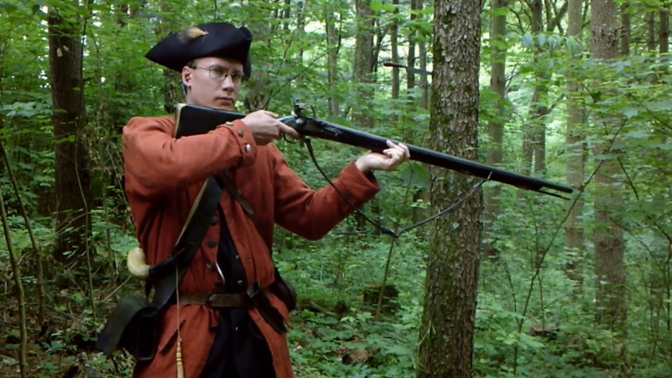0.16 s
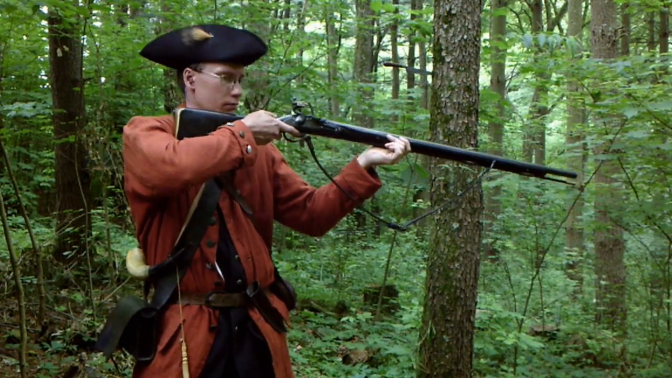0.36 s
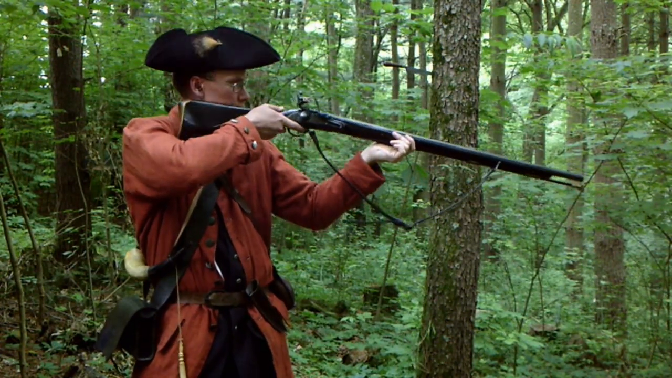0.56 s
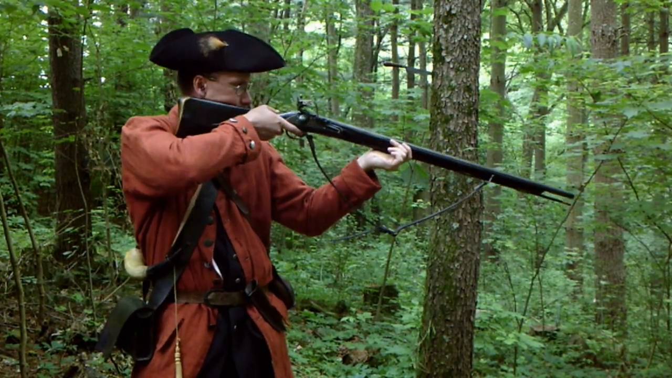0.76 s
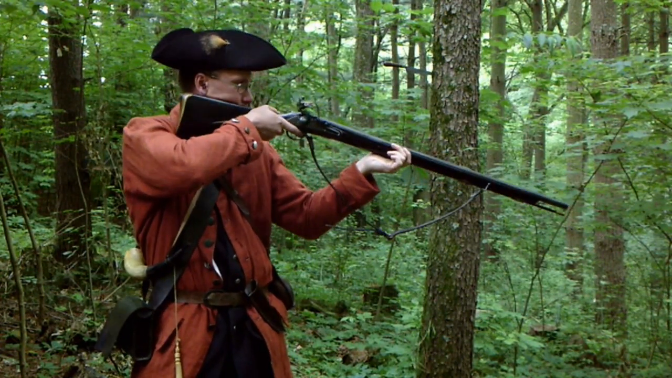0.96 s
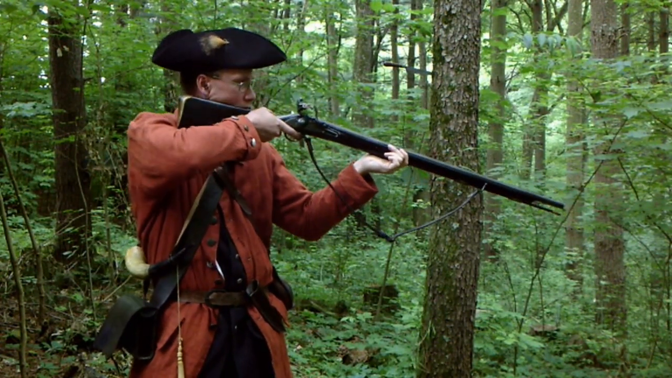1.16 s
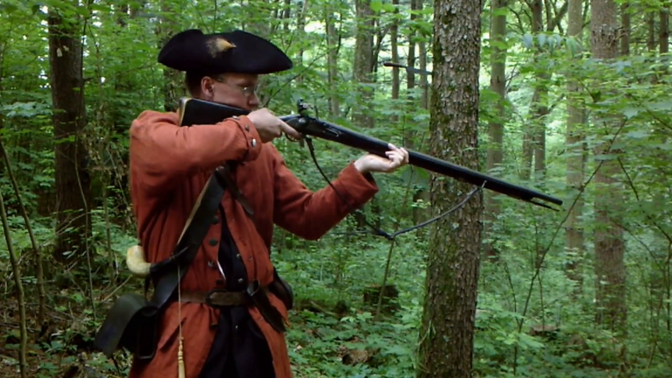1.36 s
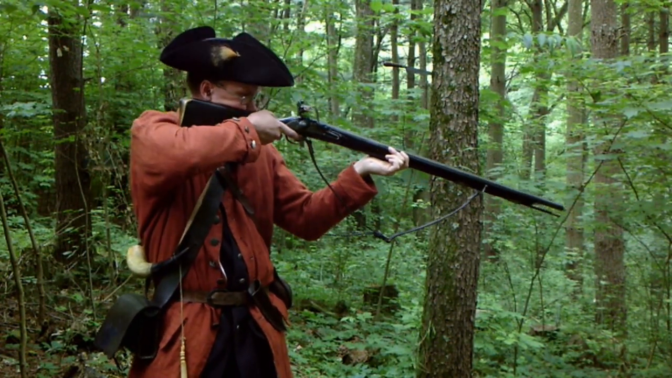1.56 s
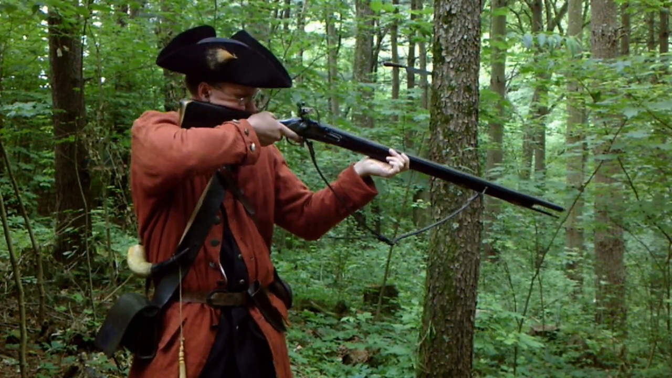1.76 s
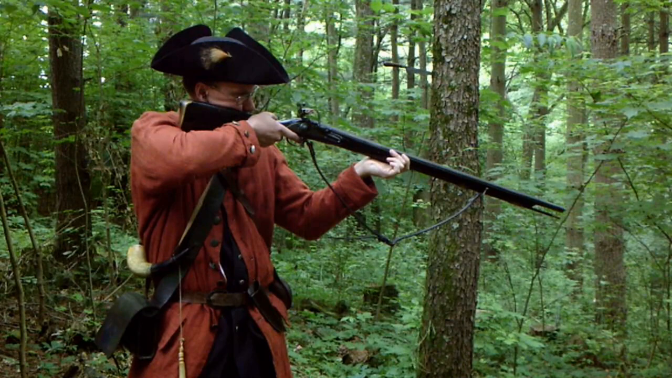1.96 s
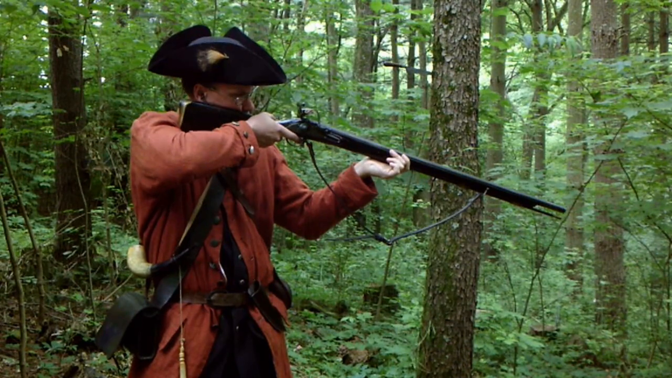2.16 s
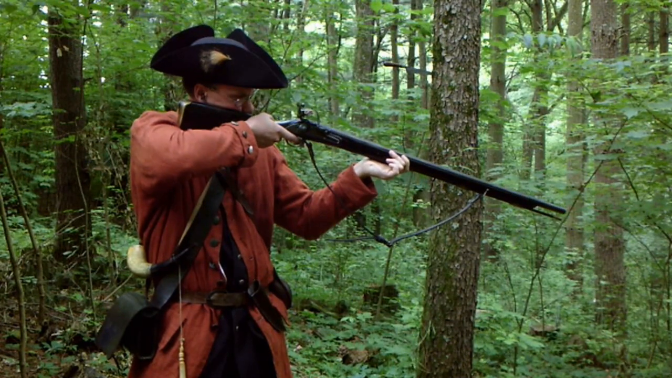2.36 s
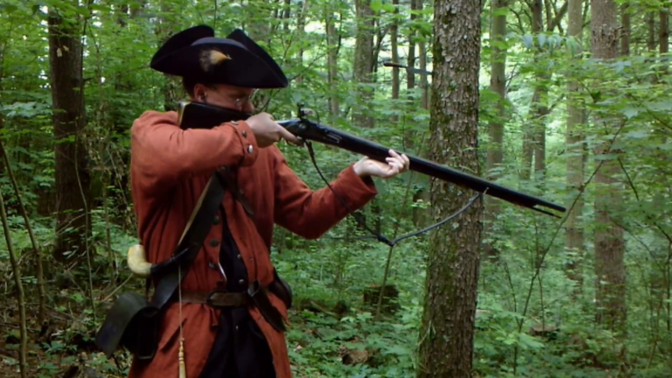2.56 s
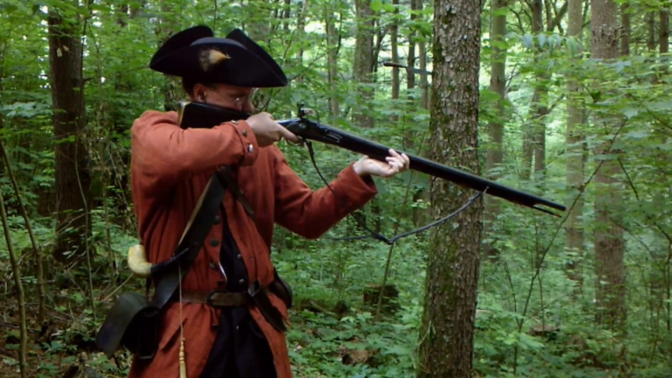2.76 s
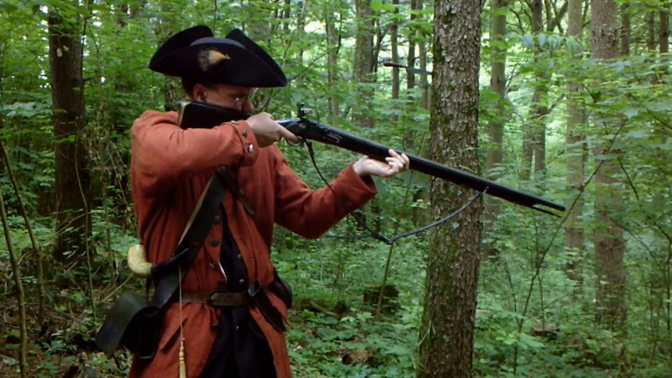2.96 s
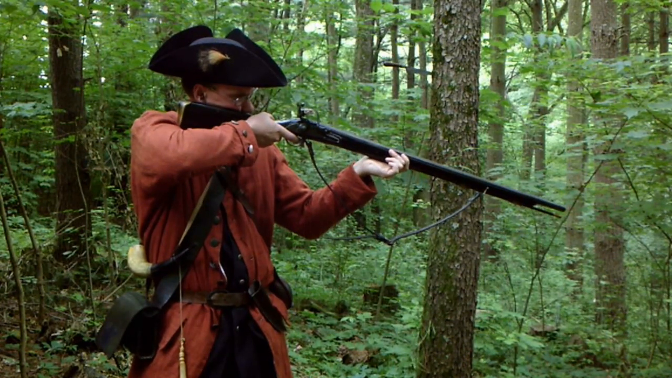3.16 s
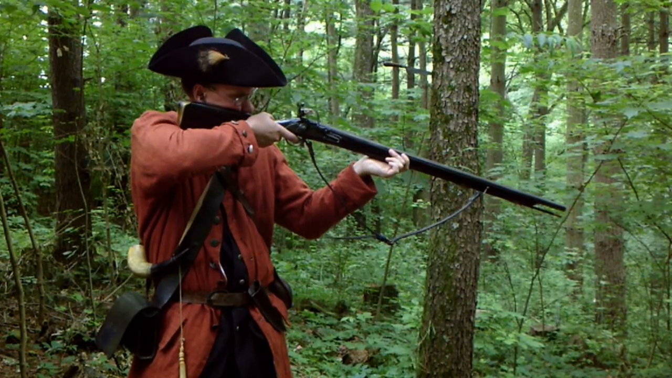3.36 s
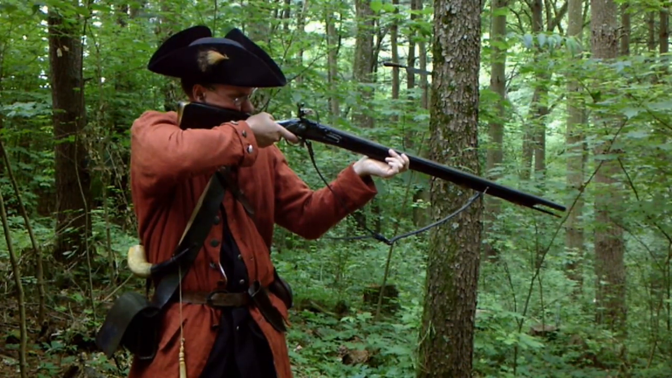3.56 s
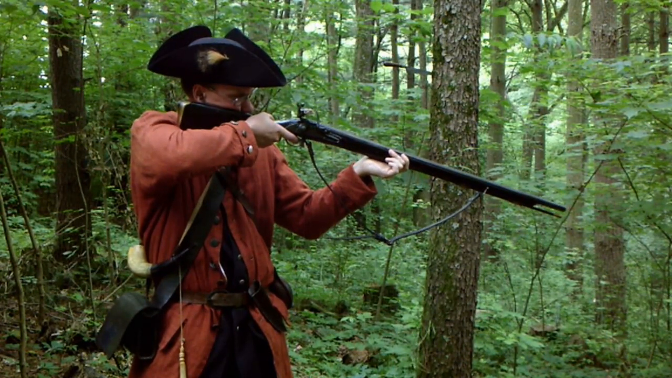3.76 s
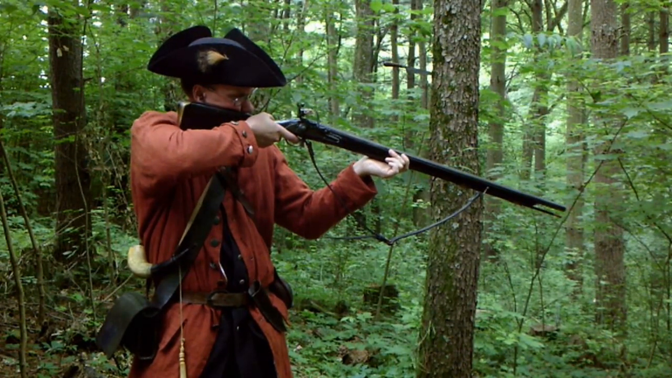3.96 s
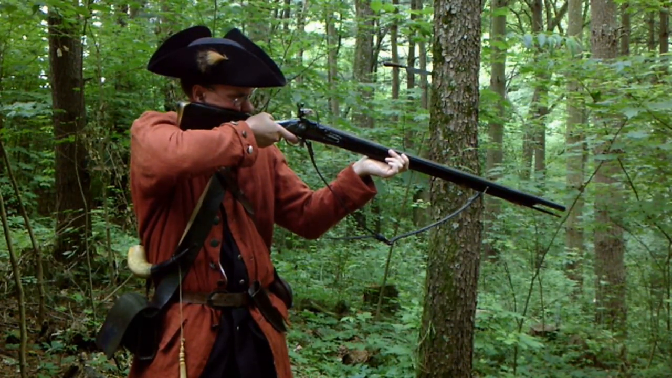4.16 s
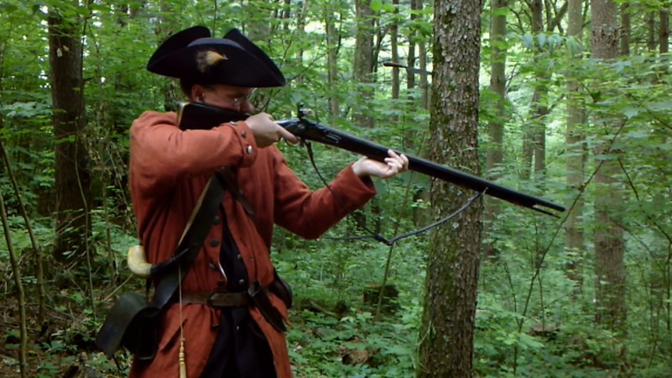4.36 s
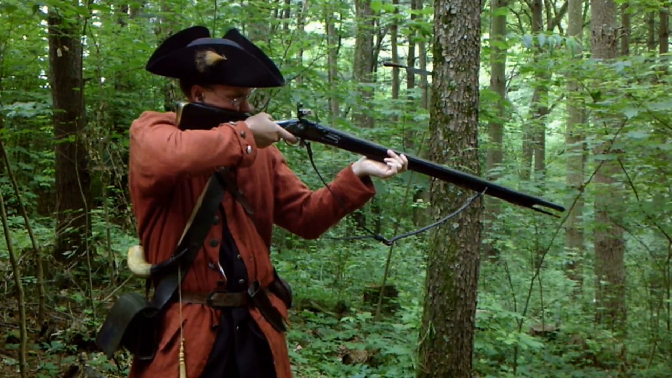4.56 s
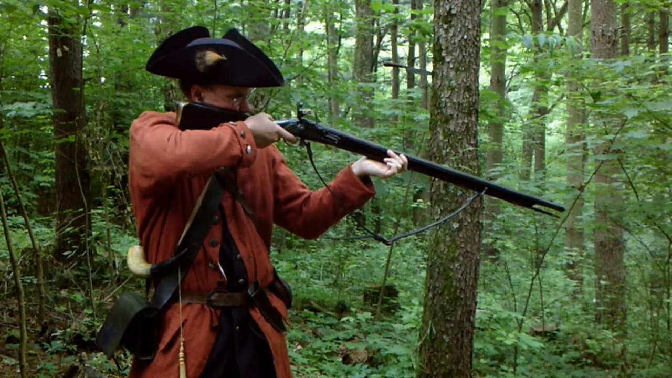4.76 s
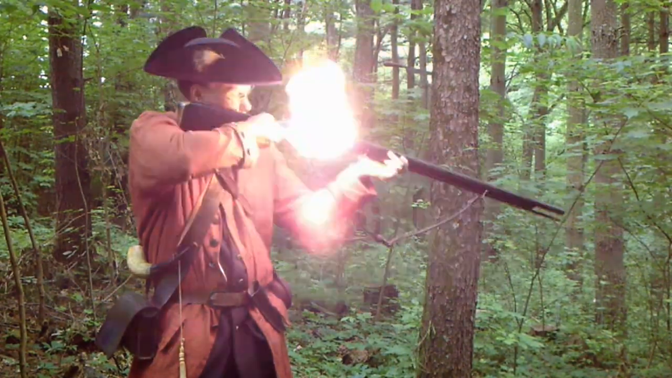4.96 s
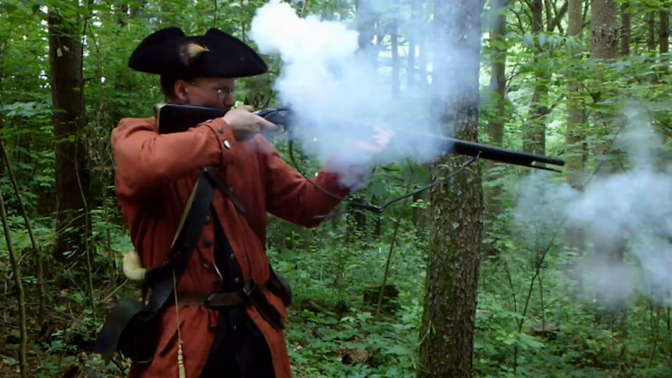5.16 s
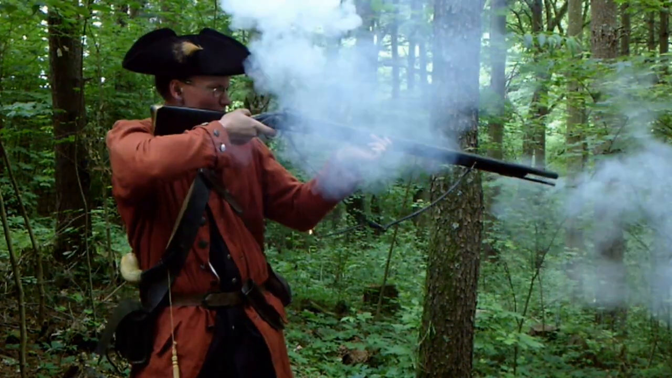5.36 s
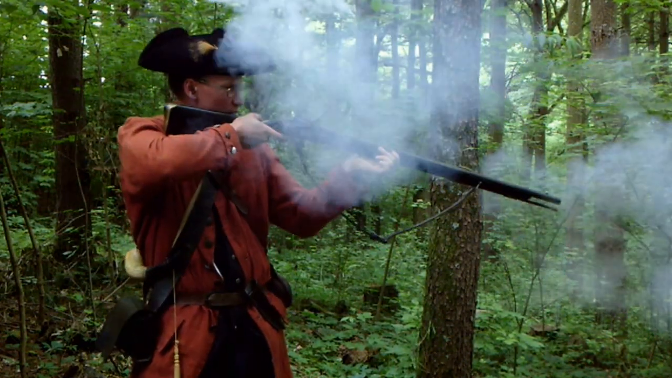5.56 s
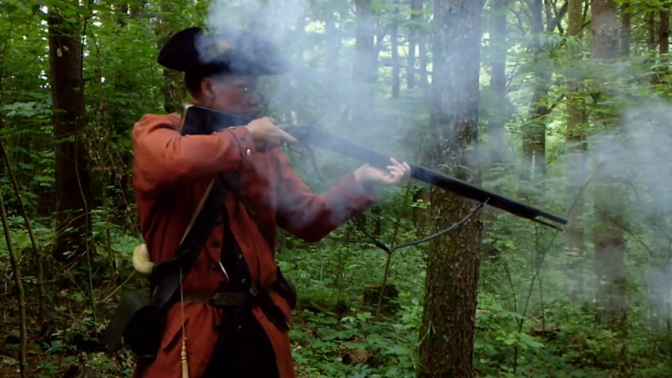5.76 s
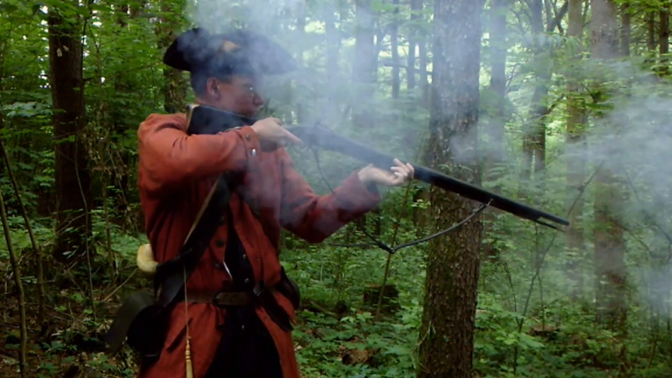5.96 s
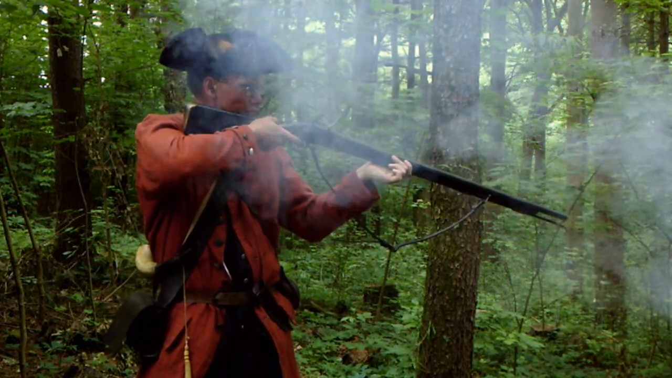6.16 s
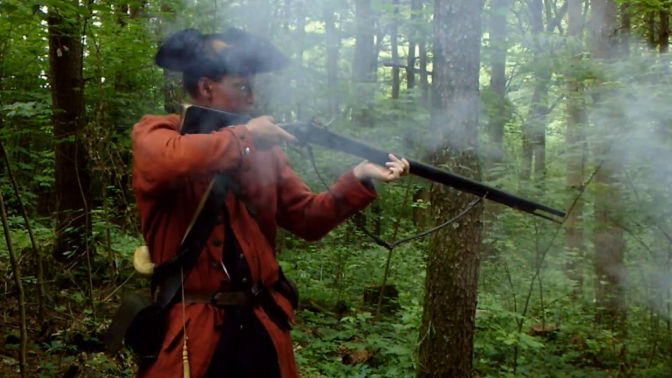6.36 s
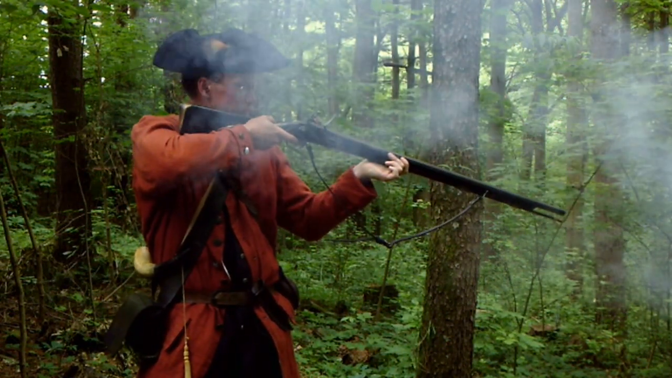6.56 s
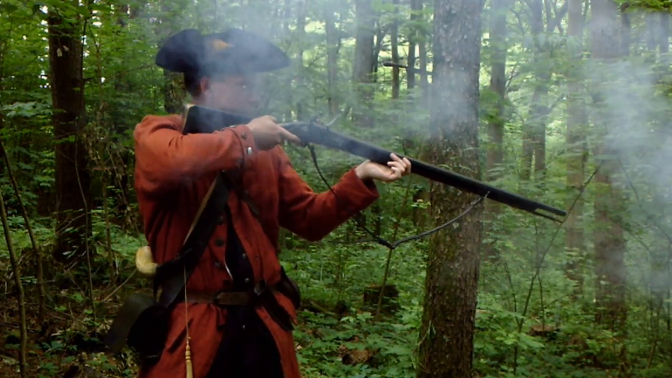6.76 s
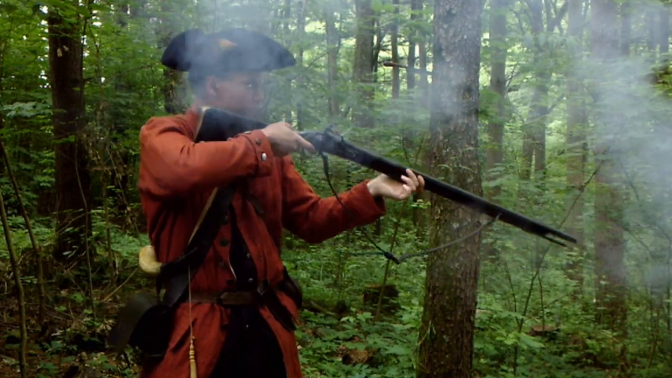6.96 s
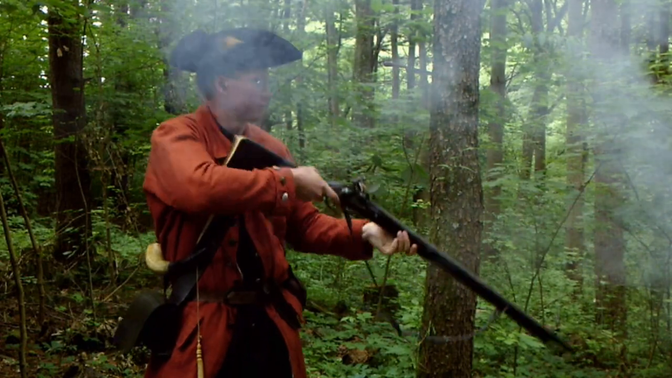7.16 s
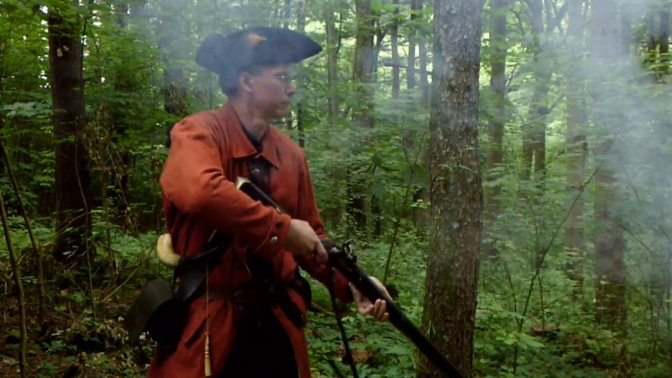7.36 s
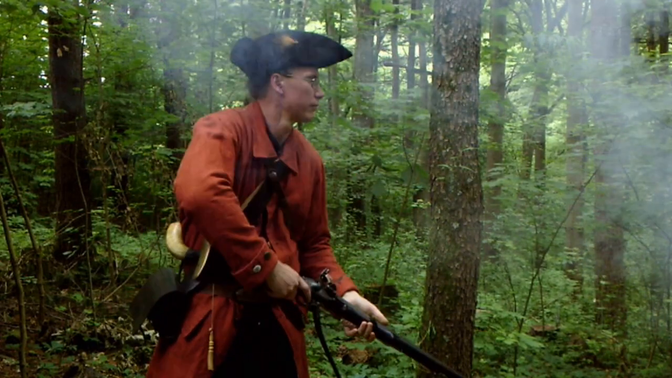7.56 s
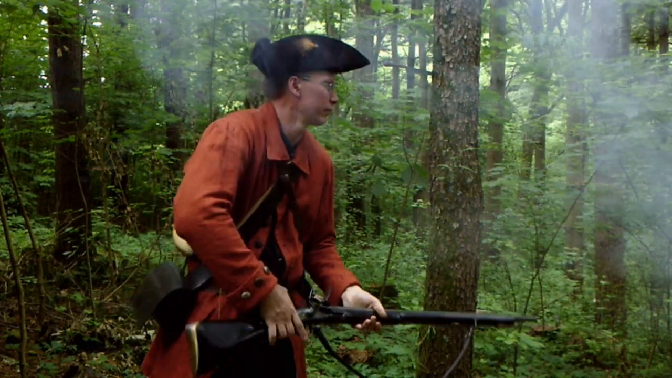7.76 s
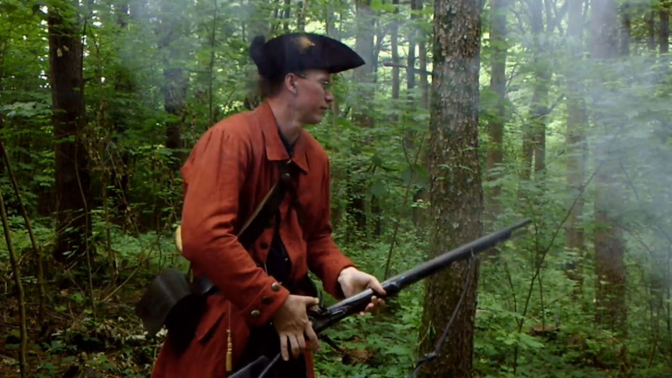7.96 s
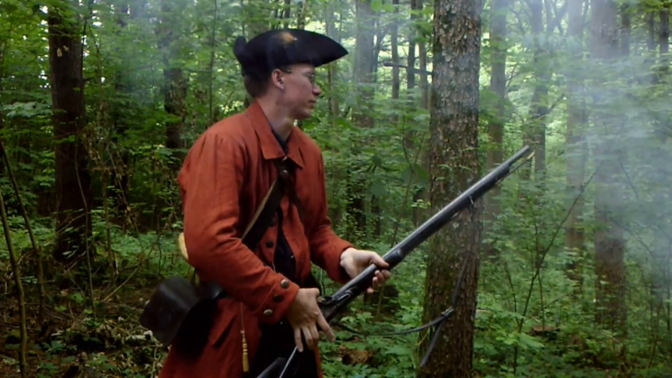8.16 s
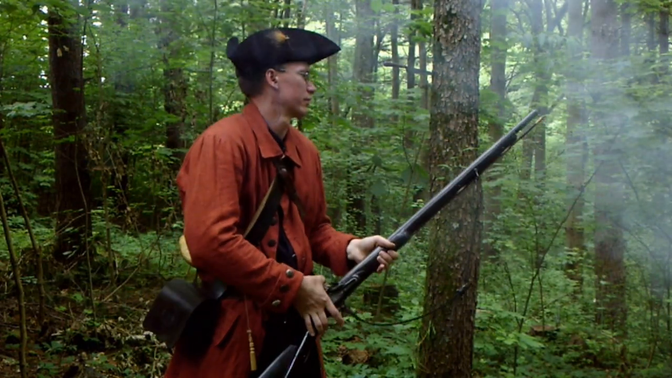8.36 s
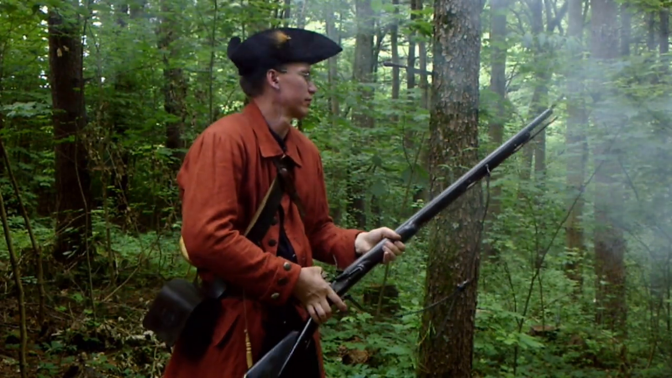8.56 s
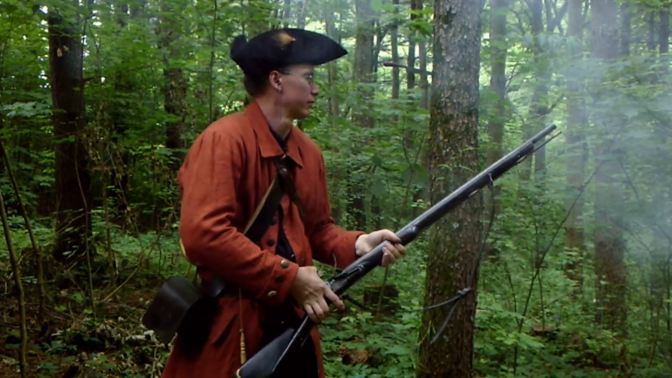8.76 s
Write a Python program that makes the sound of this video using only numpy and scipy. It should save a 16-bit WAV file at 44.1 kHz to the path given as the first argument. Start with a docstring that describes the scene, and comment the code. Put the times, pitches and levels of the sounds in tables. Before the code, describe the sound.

Birds chirp in a quiet wood, then a flintlock snaps and hisses and a huge overloaded musket blast rolls away among the trees.

```python
"""A flintlock musket fired in a wood, close to the microphone: flint on steel, hissing priming, then the charge.
Lock and fittings are struck sets of decaying modes with scrapes; hiss, puff and report are shaped noise.
The blast, a pressure pulse and gas noise, overloads the microphone and rolls away among the trunks.
Small birds, bending sine whistles, sing far off over a low rumble of air; cloth rubs now and then.
Later the gun's fittings clack as it is lowered."""
import sys
import numpy as np
from scipy import signal
from scipy.fft import rfft, irfft, next_fast_len
from scipy.io import wavfile
from scipy.ndimage import map_coordinates

SR = 44100
rng = np.random.default_rng(int(sys.argv[2]) if len(sys.argv) > 2 else 0)


def generate_wav(sig):
    """Save sig (samples, or channels by samples) to the path in sys.argv[1] as 16-bit PCM at SR."""
    pcm = np.round(np.clip(np.atleast_2d(sig).T, -1, 1) * 32767).astype(np.int16)
    wavfile.write(sys.argv[1], SR, pcm)


N = 389403  # length in samples


def amp(db):
    """Decibels to gain."""
    return 10 ** (np.asarray(db) / 20)


def unit(x):
    """Scale to rms 1."""
    return x / np.sqrt(np.mean(x ** 2) + 1e-20)


def along(points, hz):
    """Read (Hz, value) points on a log frequency axis."""
    point_hz, values = np.transpose(points)
    return np.interp(np.log(hz + 1), np.log(point_hz + 1), values)


def clock():
    """The time of every sample in seconds."""
    return np.arange(N) / SR


def wobble(rate):
    """A smooth random curve with rate knots a second."""
    knots = rng.standard_normal(int(N * rate / SR) + 4)
    return map_coordinates(knots, [clock() * rate])


def filtered(x, response):
    """Multiply the spectrum of x by a response of frequency."""
    size = next_fast_len(N + SR // 2)
    hz = np.fft.rfftfreq(size, 1 / SR)
    return irfft(rfft(x, size) * response(hz), size)[:N]


def noise(spectrum):
    """Random noise coloured by a spectrum, at rms 1."""
    white = rng.standard_normal(N)
    return unit(filtered(white, lambda hz: amp(along(spectrum, hz))))


def add(track, s, sound):
    """Mix a sound into the track from time s."""
    room = track[round(s * SR):][:len(sound)]
    room += sound[:len(room)]


def fade(t, t60):
    """Exponential decay, 60 dB down after t60 seconds."""
    return np.exp(-np.log(1000) * t / t60)


def envelope(start, attack, hold, t60):
    """A straight rise, a hold and an exponential release, in seconds."""
    t = clock() - start
    return np.clip(t / attack, 0, 1) * fade(np.maximum(t - attack - hold, 0), t60)


def scattered(x, wet_db, t60):
    """A sound with its soft return from the nearby trees, a decaying random tail."""
    t = np.arange(SR) / SR
    tail = rng.standard_normal(SR) * fade(t, t60)
    tail /= np.linalg.norm(tail)
    return x + amp(wet_db) * signal.fftconvolve(x, tail)[:N]


# Spectrum of the open air in the wood. Each row: frequency in Hz, relative density in dB per Hz.
AIR = [(5, 1.5), (15, 1.5), (24, -3.5), (66, -11.5), (108, -15.5), (200, -21.5), (310, -26), (450, -27),
       (620, -32.5), (1000, -36), (1700, -42), (3000, -42.5), (4800, -48), (6500, -53.5)]
AIR_DB = -34


def air():
    """Moving air: a restless rumble under the faint hush of leaves."""
    whole = noise(AIR)
    rumble = filtered(whole, lambda hz: 1 / (1 + (hz / 150) ** 2))
    hush = whole - rumble
    rumble_gain = amp(1.76 * wobble(7))
    hush_gain = amp(0.21 * wobble(2) + 0.77 * wobble(23))
    return amp(AIR_DB) * (rumble * rumble_gain + hush * hush_gain)


# Shapes of bird notes by name. Each list: pitch ratios at even steps through the note.
SHAPES = {"fall": [1.5, 1.01, .71], "rise": [.76, 1, 1.22], "sag": [1.13, 0.98, .85], "arch": [.8, 1, .85],
          "scoop": [1.08, 1, 1.11], "held": [1.01, 0.99, 0.97]}
WARBLE, WARBLE_RATE = .021, 150  # unsteadiness of pitch: greatest scale as a share, random knots a second


def syllable(shape, length, hz):
    """A whistle that bends smoothly through its shape; the faster the bend, the more it warbles, up to a limit."""
    ratios = SHAPES[shape]
    u = np.linspace(0, 1, int(length * SR))  # progress through the note
    steps = np.linspace(0, 1, len(ratios))
    bend = np.polyval(np.polyfit(steps, ratios, len(ratios) - 1), u)
    turns = map_coordinates(rng.standard_normal(size=256), [u * length * WARBLE_RATE], mode="mirror")
    bend_speed = np.ptp(ratios) / length
    warble = WARBLE * turns * min(bend_speed / 3.5, 1)
    swell = np.sqrt(np.clip(8 * u * (1 - u), 0, 1))
    return swell * np.sin(2 * np.pi * np.cumsum(hz * bend * (1 + warble)) / SR)


# The nearest bird's phrase: a downslur, an upsweep and a low closing note. Each row: upsweep start in seconds,
# its pitch in Hz, its relative level in dB, downslur lead in seconds, downslur relative level in dB,
# closing note lag in seconds.
PHRASES = [(.125, 3450, -55, .08, -62, .19), (1.18, 3200, -55.5, .145, -58.5, 0.043),
           (2.175, 3150, -54, 0.27, -52.5, .05), (2.535, 3050, -56, .15, -66, .085),
           (3.06, 3140, -51, 0.077, -59, 0.13), (4.085, 3050, -50, .075, -61, .12),
           (7.525, 2750, -54.5, .15, -61, .16)]
# Single notes: a few arch syllables just before the nearest bird's upsweeps, the rest calls of other birds in
# the wood. # Each row: start in seconds, shape, length in seconds, pitch in Hz, relative level in dB.
NOTES = [(.19, "sag", .055, 3900, -57), (.3, "arch", 0.057, 3500, -54), (.545, "arch", .09, 4850, -57.5),
         (.64, "rise", .06, 4450, -62), (.78, "scoop", .32, 3830, -57.5), (1.12, "held", .42, 4560, -69),
         (1.115, "arch", .08, 3000, -57), (2.115, "arch", .06, 2840, -55), (2.44, "arch", 0.038, 4090, -56),
         (3.42, "held", 0.73, 3590, -63.5), (4.05, "held", 0.24, 3070, -56), (4.14, "held", .36, 3720, -61),
         (4.49, "sag", .07, 3950, -56.5), (4.35, "held", .55, 3496, -65.5),
         (6.55, "sag", 0.089, 3320, -52.5), (7.06, "sag", .07, 4150, -60), (7.272, "rise", .03, 4150, -55),
         (7.465, "arch", .055, 2700, -55.5), (7.658, "arch", .055, 3500, -51.5),
         (7.75, "rise", .19, 4030, -62), (7.94, "arch", .12, 3350, -55.5), (8.57, "rise", 0.063, 4150, -55)]
SLUR_S, SLUR_HZ = .11, 2900  # downslur length and base pitch
SWEEP_S = .075  # upsweep length
CLOSE_S, CLOSE_HZ, CLOSE_DB = .07, 2520, -3  # closing note; level against the upsweep


def birds():
    """One bird repeats its whistled phrase, others call between; farther ones twitter at random times."""
    out = np.zeros(N)
    for s, hz, db, lead, slur_db, lag in PHRASES:
        add(out, s - lead, amp(slur_db) * syllable("fall", SLUR_S, SLUR_HZ))
        add(out, s, amp(db) * syllable("rise", SWEEP_S, hz))
        add(out, s + lag, amp(db + CLOSE_DB) * syllable("sag", CLOSE_S, CLOSE_HZ))
    for s, shape, length, hz, db in NOTES:
        add(out, s, amp(db) * syllable(shape, length, hz))
    for when, span, distance, height, kind in rng.random(size=(50, 5)):
        shape = ("rise", "sag", "arch")[int(3 * kind)]
        note = syllable(shape, .02 + .05 * span, 2350 + 2000 * height)
        add(out, when * N / SR, amp(-59.0 - 7 * distance) * note)
    return out * amp(-1.1 + 1.8 * wobble(45))  # the level flutters


# The shooter's coat and straps shift. Each row: start in seconds, length in seconds, relative level in dB.
SHIFTS = [(0, .44, -52.5), (2.3, .42, -54), (3.08, .11, -50), (3.33, 0.4, -55.5), (3.818, .17, -52.5),
          (7.58, 0.5, -52.5)]
# Spectrum of the rubbing cloth. Each row: frequency in Hz, relative density in dB per Hz.
CLOTH = [(100, -18), (300, 3), (700, 3.5), (1400, -3), (3000, -4.5), (5500, -15.5)]


def coat():
    """Cloth rubs in short, grainy strokes of noise."""
    strokes = np.zeros(N)
    for s, length, db in SHIFTS:
        add(strokes, s, amp(db) * np.sin(np.linspace(0, np.pi, int(length * SR))))
    return strokes * unit(noise(CLOTH) * amp(3.6 * wobble(150)))


# Spectrum of the distant hillside's answer. Each row: frequency in Hz, relative density in dB per Hz.
DISTANT = [(100, -19.5), (250, -3), (450, 1), (620, -6.5), (770, 2.5), (920, -10), (1400, -10), (2500, -20),
           (5000, -33)]
HILL_S, HILL_DB = 6.32, -48


def hillside():
    """The report comes back late from far away, drawn out and with its treble gone."""
    swell = envelope(HILL_S, attack=.3, hold=.7, t60=3.6)
    return amp(HILL_DB + 1.2 * wobble(23)) * swell * noise(DISTANT)


def strike(modes, scrape, scrape_t60):
    """One metal contact: decaying modes at new strengths and a short noise scrape."""
    t = np.arange(SR // 4) / SR
    hit = scrape * fade(t, scrape_t60) * rng.standard_normal(len(t))
    for hz, db, t60 in modes:
        tone = np.sin(2 * np.pi * (hz * t + rng.random()))
        hit += amp(db + rng.normal(0, 3)) * fade(t, t60) * tone
    return hit * (1 - np.exp(-t / 0.00025))  # softened onset


# Clacks as the gun is lowered. Each row: start in seconds, relative level in dB, cutoff in Hz above which
# the contact excites little.
RATTLE = [(7.602, -37, 2400), (7.6078, -30, 2400), (7.6385, -41, 6000), (7.6422, -28, 2400),
          (8.7116, -40, 6000), (8.7137, -25.5, 6040), (8.7158, -21.5, 4400), (8.719, -24, 2400)]
# Ringing modes of the fittings. Each row: frequency in Hz, mean relative level in dB, t60 in seconds.
FITTINGS = [(1610, -4, 0.015), (2038, 2.5, 0.029), (2250, 4, 0.012), (2566, 1.5, 0.019), (3130, 1.5, 0.015),
            (3350, -2.5, 0.016), (4160, 4.5, .016), (5040, -4, 0.026)]
STOCK_S, STOCK_DB, STOCK_HZ, STOCK_T60 = 7.673, -30.5, 560, 0.032  # dull knock on the wooden stock


def fittings():
    """Loose steel clacks on the gun and the stock takes a knock; soft contacts ring mainly the low modes."""
    out = np.zeros(N)
    for s, db, contact_hz in RATTLE:
        softness = signal.butter(4, contact_hz, fs=SR)
        clack = signal.lfilter(*softness, strike(FITTINGS, scrape=2.3, scrape_t60=0.025))
        add(out, s, amp(db - 5) * clack)
    t = np.arange(SR // 8) / SR
    knock = fade(t, STOCK_T60) * np.sin(2 * np.pi * STOCK_HZ * t)
    add(out, STOCK_S, amp(STOCK_DB) * knock)
    return out


# Knocks of flint on steel and of the pan cover flying open. Each row: start in seconds, relative level in dB.
LOCK = [(4.9056, -12.5), (4.9098, -13.5), (4.9135, -11.5), (4.9196, -12), (4.9222, -14), (4.9355, -24.5)]
# Ringing modes of the lock. Each row: frequency in Hz, mean relative level in dB, t60 in seconds.
LOCK_MODES = [(652, -5, 0.048), (744, 0, 0.027), (1520, 0.5, 0.033), (1740, 0, .05), (2010, 0, 0.043),
              (2590, -4.5, 0.042), (3030, -11, 0.049), (4076, -13.5, 0.05), (4970, -13.5, .04)]
# Spectra of the flint grinding on the steel, the priming hissing in the pan and the flame puffing through
# the touch hole. Each row: frequency in Hz, relative density in dB per Hz.
GRIND = [(150, -28.5), (450, -5), (680, 4), (1000, -3), (1750, 2), (2600, -1.5), (4200, -4), (5500, -2),
         (7000, -20.5)]
HISS = [(100, -27), (500, -6.5), (1800, -2), (3500, -1), (5500, -5), (7000, -12.5)]
PUFF = [(60, -20), (180, -12), (330, -2), (500, -2.5), (900, -10.5), (2500, -32.5)]
FLINT_S, FLINT_DB = 4.9045, -15.5  # the flint starts to grind along the steel
FLASH_S, FLASH_DB = 4.901, -25.5  # the priming catches
PUFF_S, PUFF_DB = 4.984, -27  # the flame blows through the touch hole


def lock():
    """The flint grinds sparks off ringing steel; the priming hisses in the pan and puffs through the touch hole."""
    snap = np.zeros(N)
    for s, db in LOCK:
        add(snap, s, amp(db - 6.5) * strike(LOCK_MODES, scrape=1.4, scrape_t60=0.027))
    grind = amp(FLINT_DB) * envelope(FLINT_S, attack=.002, hold=.0165, t60=.045) * noise(GRIND)
    sputter_db = 1.6 * wobble(350)
    flare = envelope(FLASH_S, attack=0.014, hold=0.049, t60=.16)
    hiss = amp(FLASH_DB + sputter_db) * flare * noise(HISS)
    puff = amp(PUFF_DB) * envelope(PUFF_S, attack=.006, hold=0.0087, t60=.18) * noise(PUFF)
    return snap + grind + hiss + puff


# How long the wood holds each pitch. Each row: frequency in Hz, t60 in seconds.
WOOD = [(60, 1.3), (150, 1.6), (280, 2.82), (500, 2.28), (900, 2.5), (1500, 2.1), (2400, 1.75),
        (4000, 1.435), (5500, 1.18)]


def among_trees(x):
    """Let a steady sound die as it does in the wood: leaves take the treble, soft ground the bass."""
    hz, t, spectra = signal.stft(x, SR, nperseg=512)
    decay = fade(t, along(WOOD, hz)[:, None])
    return signal.istft(spectra * decay, SR, nperseg=512)[1][:N]


# Spectra of the gas jet at the muzzle, the nearest trunks' answer, and the report scattered by the wood
# as it starts. Each row: frequency in Hz, relative density in dB per Hz.
CRACK = [(100, -13.5), (400, -3.5), (900, -3), (1700, 0.5), (3800, -1.5), (5500, -5)]
BOOM = [(100, -25), (220, -8.5), (300, 0.5), (480, 2), (600, -12.5), (1000, -30)]
REPORT = [(25, -14), (90, -6.5), (165, -12), (240, -3), (330, -0.5), (470, 2), (630, -5.5), (810, -3),
          (980, -8.5), (1500, -9), (2400, -10), (3800, -11), (5200, -12.5), (6500, -18)]
# Single echoes from stands of trees. Each row: start in seconds, level in dB.
ECHOES = [(5.258, -1), (5.375, -13.5), (5.434, -14.5), (5.631, -27.5), (5.72, -34.5), (6.09, -43)]
SHOT_S, BOOM_S = 5.0238, 5.063  # the shot, and the nearest trunks' answer
BUILD_S = 0.064  # time constant as the wave reaches more trunks and the returns thicken
NEAR_STAND_DB, NEAR_STAND_T60 = 9.5, 1.36  # first wash from the closest trees, level against the long roll


def blast():
    """The muzzle's crack and pressure wave, then the report thrown back by countless trunks."""
    t = clock()
    near = np.zeros(N)
    add(near, SHOT_S, amp(5) * fade(t, 0.18) * noise(CRACK))
    u = t / 0.0019
    add(near, SHOT_S + 0.0024, amp(17) * (1 - u) * np.exp(-u))  # a push, then suction
    add(near, BOOM_S, amp(4.5) * fade(t, 0.45) * noise(BOOM))

    far = np.zeros(N)
    near_stand = amp(NEAR_STAND_DB) * fade(t, NEAR_STAND_T60)
    returns = (1 - np.exp(-t / BUILD_S)) * (1 + near_stand)
    add(far, SHOT_S, amp(-.1) * returns * among_trees(noise(REPORT)))
    clumps_db = 0.75 * wobble(35) + 1.3 * wobble(240)  # trunks stand unevenly, so returns come in clumps
    far *= amp(clumps_db)

    echo_level = np.zeros(N)
    for s, db in ECHOES:
        add(echo_level, s, amp(db) * fade(t[:SR], .16))
    return near + far + echo_level * noise(REPORT)


def scene():
    """The wood with its birds, the shooter's coat and the gun, mixed at one microphone."""
    gun = scattered(lock(), wet_db=-17.5, t60=0.63) + scattered(fittings(), wet_db=-12.5, t60=0.35)
    song = scattered(birds(), wet_db=-.5, t60=.8)
    return (air() + song + coat() + hillside() + gun + blast())[None]


MIC_HZ, TOP_HZ = 5656, 15900  # the microphone's steep upper edge; nothing passes above the top


def record(dry):
    """A narrow-band microphone overloads; only its clipping makes sound in the high treble."""
    heard = filtered(dry[0], lambda hz: 1 / np.sqrt(1 + (hz / MIC_HZ) ** 50))
    ceiling = .71
    clipped = np.clip(heard, -ceiling, ceiling)
    treble = [(5000, 0), (6500, -8.5), (10500, -4.5), (15500, -8)]  # (Hz, dB)

    def response(hz):
        """Treble tilt, closing over the last 200 Hz below the top."""
        return amp(along(treble, hz)) * np.clip((TOP_HZ - hz) / 200, 0, 1)

    return filtered(clipped, response)[None]


dry = scene()
out = record(dry)
generate_wav(out)
```